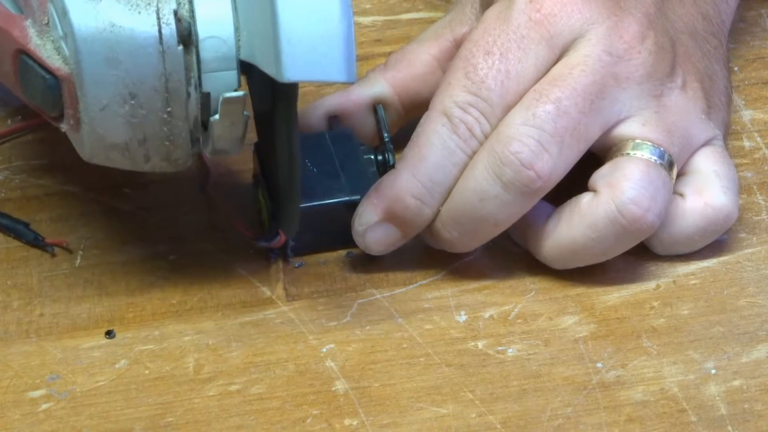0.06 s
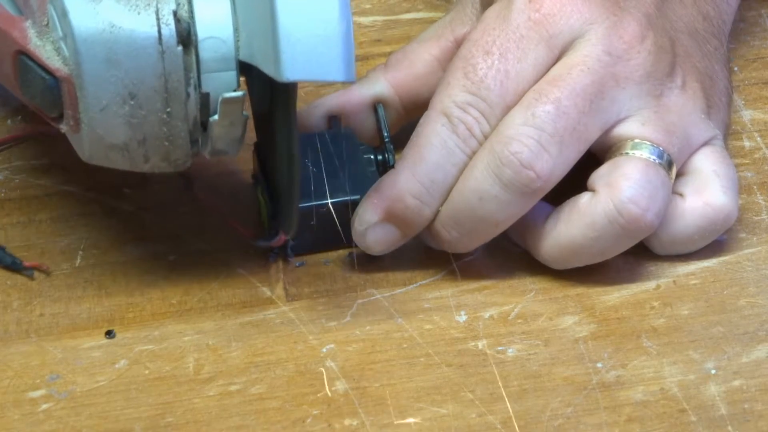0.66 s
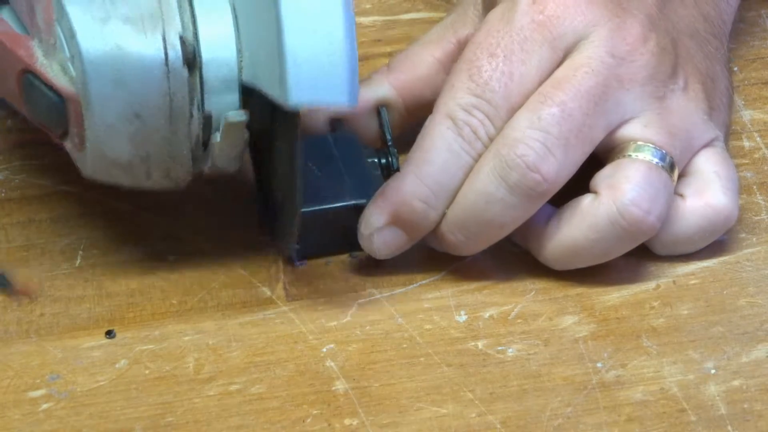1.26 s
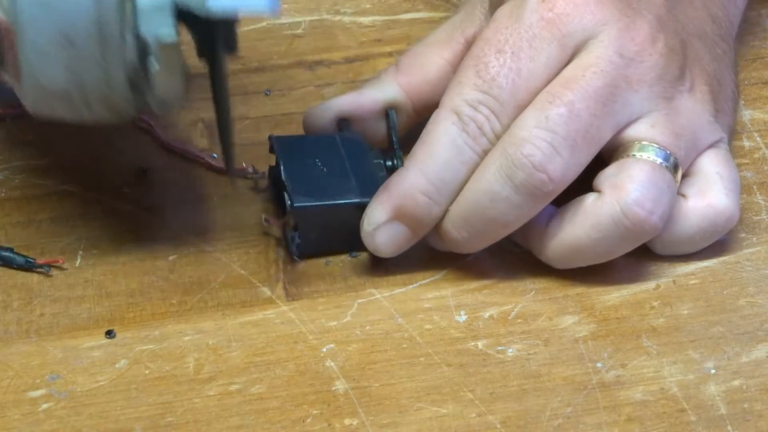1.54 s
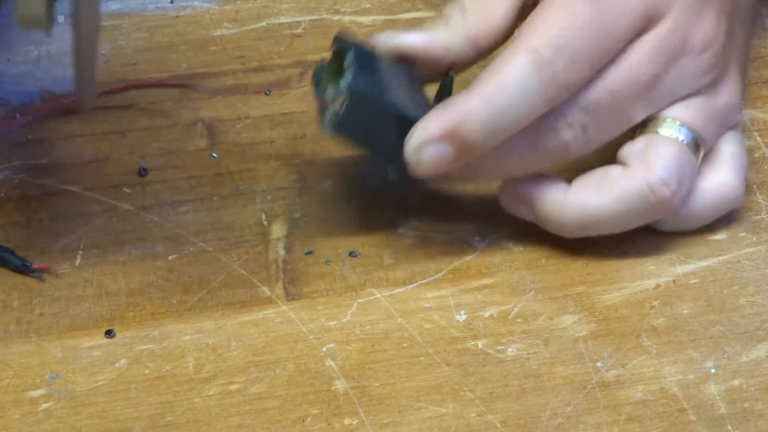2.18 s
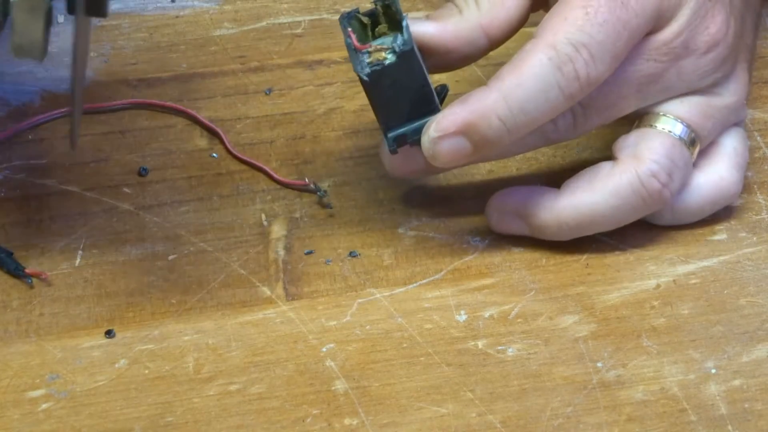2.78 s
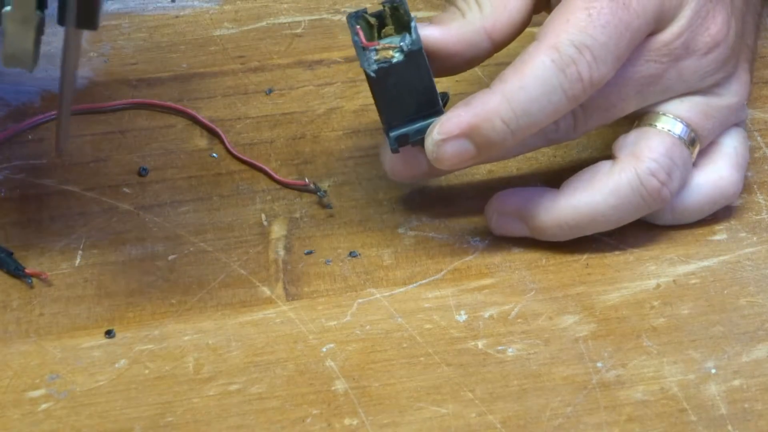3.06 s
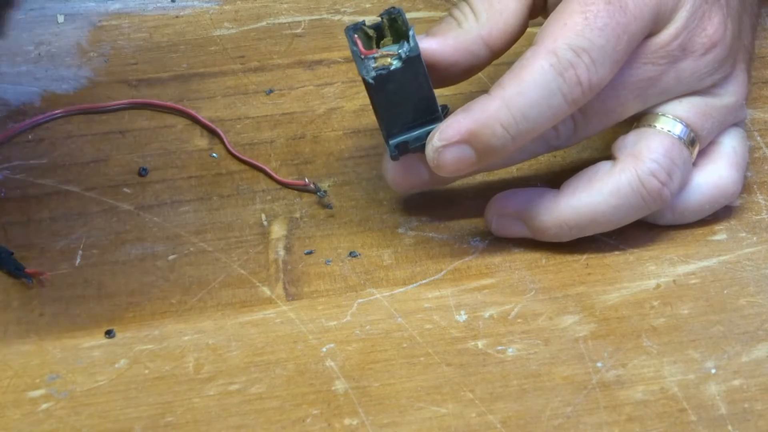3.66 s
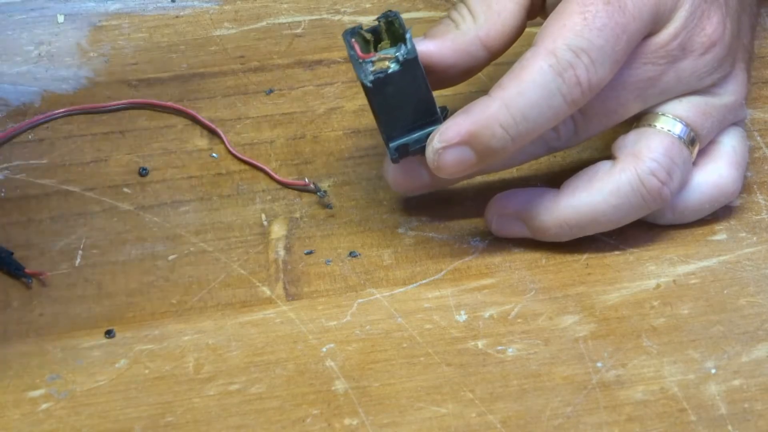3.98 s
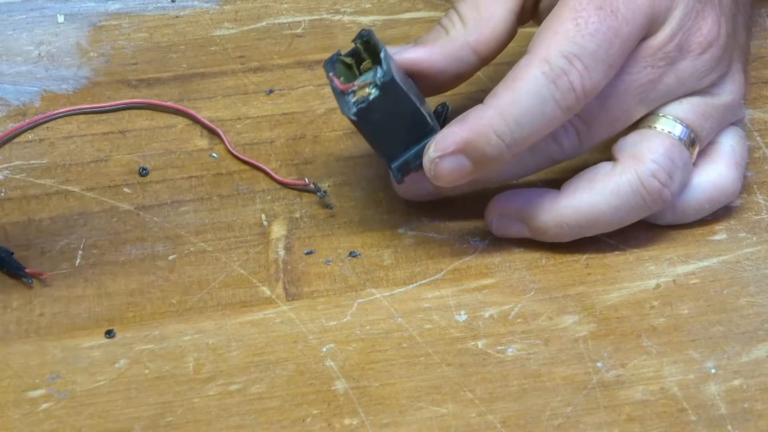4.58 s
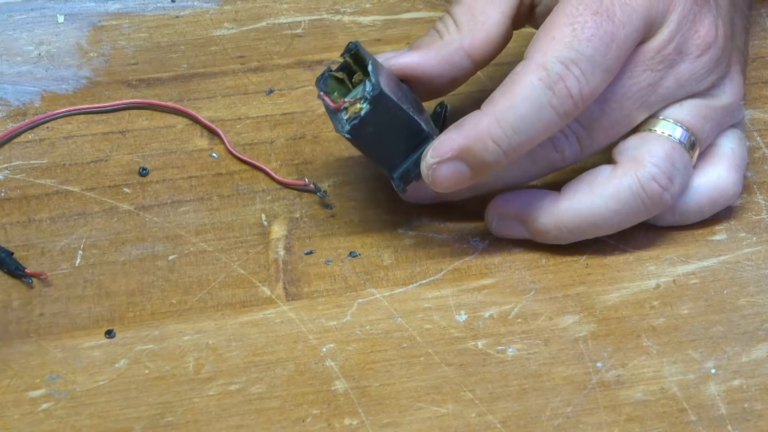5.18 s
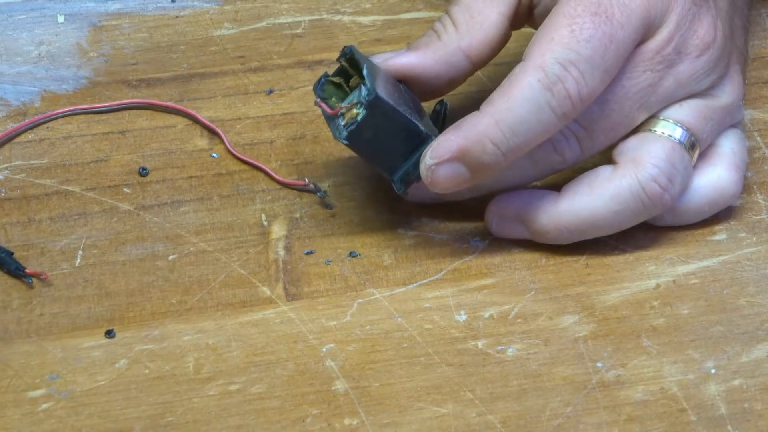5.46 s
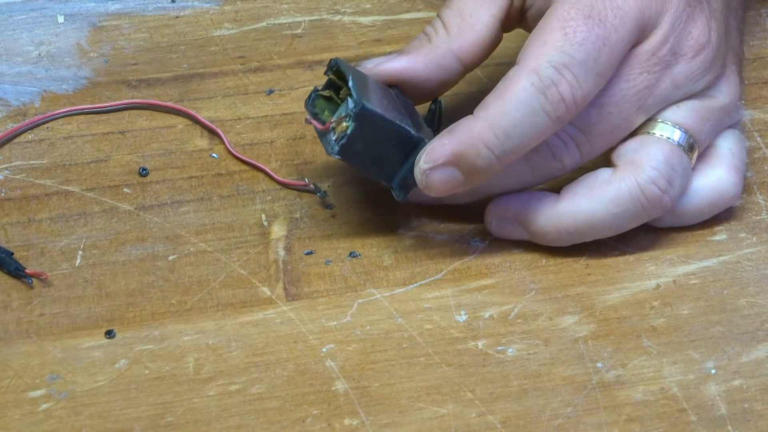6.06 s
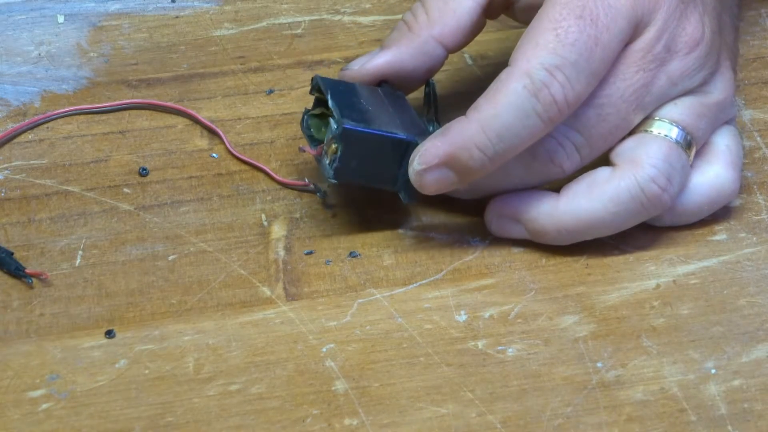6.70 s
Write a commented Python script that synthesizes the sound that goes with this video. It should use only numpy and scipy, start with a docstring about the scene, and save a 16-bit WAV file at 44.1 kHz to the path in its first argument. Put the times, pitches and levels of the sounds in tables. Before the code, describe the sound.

Close to a wooden workbench, an angle grinder cuts a small plastic case with a gritty rasp and shifting squeals. It soon lifts clear and runs free with rushing air and a motor whine, then is switched off and coasts to rest, gears rattling. It is laid down with a double knock and a lighter one. Faint room hiss rises and the case scrapes softly on the bench.

```python
"""Workshop, stereo microphone close to a wooden bench, steady work just left of centre. An angle grinder cuts a
small plastic case: grit tears, and the rubbing disc squeals on multiples of its speed. At 1.2 s it lifts clear
and runs free, fan rushing, motor whining. Switched off at 2.8 s, it coasts to rest, gear teeth rattling the
housing. At 5.6 s it is laid down with a double knock and a lighter one; the background hiss then rises, a
little to the right, and the case scrapes on the bench."""
import sys
import numpy as np
from scipy import signal
from scipy.fft import rfft, irfft, next_fast_len
from scipy.io import wavfile
from scipy.ndimage import uniform_filter1d, map_coordinates

SR = 44100
rng = np.random.default_rng(int(sys.argv[2]) if len(sys.argv) > 2 else 0)


def digitize_waveform(pressure):
    """Quantize a signal to 16-bit integers and store it at the path in sys.argv[1].

    Rows of a 2-D input are taken as channels; values are limited to [-1, 1].
    """
    field = np.atleast_2d(pressure).T
    bounded = np.clip(field, -1, 1)
    quanta = np.round(bounded * 32767).astype(np.int16)
    wavfile.write(sys.argv[1], SR, quanta)


N = 305613
T = np.arange(N) / SR
TOP_HZ = 11080  # upper edge of the microphone's band
LIFT_S, RUN_UP_S, FREE_HZ = 1.17, 0.55, 138.8  # out of the cut the disc runs up to its free speed
SWITCH_OFF_S, STOP_S, DRAG_S = 2.835, 5.07, 1.95  # DRAG_S: time constant of the coasting

# spectrum of the room tone: f/Hz, level/dB
HISS_SPECTRUM = [(35, -62.5), (100, -34.5), (170, -25.5), (400, -25), (620, -20.5), (800, -16.5),
                 (1150, -9), (1550, -2.5), (1800, -4), (2000, -13.5), (2500, -18), (3600, -27), (4600, -22),
                 (6500, -29), (11000, -28.5)]
# room tone at the microphone: t/s, level/dB
HISS_ENVELOPE = [(0, -63), (5.2, -73), (5.58, -72), (5.75, -60.5), (6.15, -60), (6.45, -58), (6.93, -56)]
# where the bench sounds sit between the channels: t/s, left minus right/dB
BALANCE = [(0, 0.8), (1.7, 1), (3.2, .9), (4.7, 2.4), (5.4, 0), (5.6, 1.5)]
# resonances of the scraping case: f/Hz, width/Hz, level/dB
CASE_MODES = [(5700, 450, 0), (7400, 600, -8)]
# the tool rubs the bench as it is lowered: t/s, level/dB
BENCH_RUBS = [(4.98, -67.5), (5.57, -71)]
# the tool lands on the bench: t/s, level/dB, contact/ms
LANDINGS = [(5.583, -5, 0.18), (5.606, -10, 0.19), (5.81, -15, 0.21)]
# resonances struck by the landing: f/Hz, level/dB, t60/s
BENCH_MODES = [(185.4, -4, 0.35), (440, -6, 0.19), (635, -1.5, 0.23), (680, 1, 0.23), (770, 0.5, 0.28),
               (816, 3, 0.31), (990, 0, 0.23), (1010, -3, 0.18), (1150, -2, 0.42), (1410, -29, 0.71),
               (1450, 1, 0.39), (1800, 0.5, 0.27)]
# spectrum of a landing's crack and thud: f/Hz, level/dB
THUD_SPECTRUM = [(30, -46), (110, -14), (190, -13), (290, -19), (450, -22), (700, -11), (1080, 6.5),
                 (1400, -8.5), (2100, -12), (3200, -25), (6000, -23.5), (11000, -23)]
# spectra of the fan's rush, the vents it passes and the motor brushes: f/Hz, level/dB
FAN_SPECTRUM = [(100, -24), (220, -20.5), (350, -5), (550, -6), (750, -3), (900, -2.5), (1150, -0.5),
                (1550, -2.5), (2500, -0.5), (6000, -8)]
VENT_SPECTRUM = [(40, -45), (120, -33), (230, -22), (330, -6), (500, 1.5), (850, 6.5), (1100, 4), (1320, 8),
                 (1650, 0.5), (2500, 5), (5000, -31)]
BRUSH_SPECTRUM = [(150, -50), (1000, -25.5), (1750, -4.5), (1900, 2.5), (2600, 7.5), (3050, 2), (4400, 1),
                  (5500, -1.5), (7500, 4), (9000, -11.5), (11000, -29)]
# motor, fan and gear tones: multiple of disc speed, level/dB, flutter/0-1, exponent of the fade with speed
WHINE_TONES = [(1.33, -70, 0.95, 5.3), (1.97, -63.5, 0.6, 5), (2.68, -57.5, .08, 24),
               (3.966, -62.5, 0.3, 10), (4.94, -65, 0.6, 3), (6.325, -55.5, 0.7, 2.1),
               (8.19, -47.5, 0.5, 18), (20.51, -45, 0.3, 43), (27.97, -53, .3, 8), (31, -52, 0.93, 2.9)]
# low and high resonances of the gear housing: f/Hz, width/Hz, level/dB
HOUSING_LOW_MODES = [(1878, 38, 3.5), (1952, 80, 0.5), (2048, 68, -3), (2120, 38, -10.5), (2332, 49, -13)]
HOUSING_HIGH_MODES = [(3980, 23, -7.5), (4600, 62, -2.5), (5080, 90, -10.5), (5445, 170, -5.5),
                      (5544, 51, 1.5), (5840, 140, -7.5), (6080, 240, -16.5), (6920, 44, -1.5),
                      (7084, 72, 3), (8260, 90, -6), (8710, 100, -10.5), (9370, 30, -9.5),
                      (10690, 300, -6.5)]
# housing and disc ring out for a moment: t/s, boost/dB
RING_BOOSTS = [(.02, 12.5), (2.0, 11.5), (2.3, 6), (2.62, 7.5), (3.14, 2), (3.76, 2), (4.32, 5.5)]
# spectra of the tooth clicks and of grit on plastic: f/Hz, level/dB
TOOTH_SPECTRUM = [(100, -79), (300, -37), (700, -25.5), (1600, -19), (2000, -4), (2500, -6), (3200, -9.5),
                  (4400, -5), (5800, 1), (6600, -1.5), (7500, -0.5), (9000, -7), (10200, -2.5),
                  (11000, -13.5)]
GRIT_SPECTRUM = [(30, -38), (130, -36.5), (200, -28.5), (450, -26), (800, -10), (1500, -6.5), (2300, -3.5),
                 (2900, -6.5), (4200, -3.5), (6200, -0.5), (7500, -3), (9100, -3), (11000, -7)]
# envelope over the harmonics of the rim in the slot: f/Hz, level/dB
RIM_SPECTRUM = [(255, -56), (382, -67.5), (640, -69), (765, -59), (1000, -64), (1150, -52.5), (1530, -58.5),
                (1680, -58), (2040, -48.5), (2400, -61), (2680, -48)]
# the disc catches anew in the slot: start/s, end/s, disc speed/Hz, squeal level/dB, five speed multiples
DISC_CATCHES = [(0, .3, 127.5, -45.5, (13, 28, 31, 45, 53)), (.25, .57, 127.1, -41.5, (16, 27, 28, 45, 53)),
                (.57, .86, 128.1, -42.5, (17, 24, 35, 43, 48)),
                (.86, 1.17, 127.3, -45.5, (16, 45, 46, 48, 68))]
# the five squeals of a catch, lowest first: relative level/dB
SQUEAL_LEVELS = [-2, -4.5, -3, 0.5, -1]
# how hard the disc bites: t/s, share/0-1
BITE_SHARE = [(0, 0.94), (1.15, 0.77), (1.28, 0.4), (1.31, 0.16), (1.5, 0.07)]
# the tool is pressed in, eased, pulled out and moved aside: t/s, level/dB
TOOL_ENVELOPE = [(0, -26.5), (.16, -26.5), (.34, -30.5), (.62, -29.5), (1.15, -31), (1.25, -28),
                 (1.55, -32), (2.85, -28.5)]


def undb(db):
    """Decibels to gain."""
    return 10 ** (np.asarray(db) / 20)


def curve(rows):
    """Join (time, value) rows by straight lines."""
    return np.interp(T, *np.transpose(rows))


def unit(x):
    """Scale to rms 1."""
    return x / np.sqrt(np.mean(x ** 2) + 1e-20)


def noise():
    """White noise."""
    return rng.standard_normal(N)


def walk(rate):
    """Random drift with a spread near 1, changing rate times a second."""
    return 1.2 * np.interp(T * rate, np.arange(4096), rng.standard_normal(4096))


def colour(x, points):
    """Filter by a spectrum of (f/Hz, level/dB) points, cut off just above TOP_HZ."""
    size = next_fast_len(len(x) + 4096)
    hz, db = np.transpose(points)
    f = np.maximum(np.arange(size // 2 + 1) * SR / size, 1)
    gain = undb(np.interp(np.log(f), np.log(hz), db)) * (f < TOP_HZ * 1.02)
    return irfft(rfft(x, size) * gain, size)[:len(x)]


def ring(x, modes, swell_db=0, swell_rate=6):
    """Resonances (f/Hz, width/Hz, level/dB), applied twice for steep skirts; each drifts by swell_db."""
    out = 0
    for hz, width, db in modes:
        b, a = signal.iirpeak(hz, hz / (1.5 * width), SR)
        out += undb(db + swell_db * walk(swell_rate)) * signal.lfilter(b, a, signal.lfilter(b, a, x))
    return out


def room_hiss(side_db=-7, right_db=2):
    """Room tone: a soft, hollow hiss, wider than the tool and a little to the right."""
    mid, side = (unit(colour(noise(), HISS_SPECTRUM)) for _ in range(2))
    sides = np.array([[1], [-1]])
    return (mid + undb(side_db) * side * sides) * undb(curve(HISS_ENVELOPE) - sides * right_db / 2)


def workshop(x, wet_db=-9, t60_s=.22):
    """Direct sound from a little to the left; short reflections reach the channels in opposite phase."""
    t = T[:SR // 3]
    tail = rng.standard_normal(len(t)) * undb(-60 * t / t60_s) * (t > .002)
    wet = signal.fftconvolve(x, tail / np.sqrt(np.sum(tail ** 2)))[:N]
    sides = np.array([[1], [-1]])
    return x * undb(sides * curve(BALANCE) / 2) + sides * undb(wet_db) * wet / np.sqrt(2)


def case_scrape(start_s=6.37, db=-66, attack_s=0.017, t60_s=0.53, grain_db=2):
    """Plastic drags briefly over the wood with a thin, grainy squeak."""
    t = np.maximum(T - start_s, 0)
    grain = unit(ring(noise() * undb(grain_db * walk(200)), CASE_MODES))
    return grain * np.minimum(t / attack_s, 1) * undb(db - 60 * t / t60_s)


def bench_rubs(hz=655, width_hz=45, length_s=0.05):
    """A soft groan of the bench top swells and fades with each rub."""
    swell = sum(undb(db) * np.exp(-((T - s) / length_s) ** 2) for s, db in BENCH_RUBS)
    return swell * unit(ring(noise(), [(hz, width_hz, 0)]))


def knocks(ring_db=-42, thud_db=-32, crack_db=-24, thud_t60_s=0.41, crack_t60_s=0.0077):
    """Each landing cracks, rings the bench and dies away in the room."""
    t = T[:SR // 2]
    out = np.zeros(N + len(t))
    for s, db, contact_ms in LANDINGS:
        modes = sum(undb(mode_db - 60 * t / t60) * rng.choice([-1, 1]) * np.sin(2 * np.pi * hz * t)
                    for hz, mode_db, t60 in BENCH_MODES)
        decay = undb(thud_db - 60 * t / thud_t60_s) + undb(crack_db - 60 * t / crack_t60_s)
        hit = undb(ring_db) * modes + decay * unit(colour(rng.standard_normal(len(t)), THUD_SPECTRUM))
        soft = np.exp(-1000 / (contact_ms * SR))  # longer contact, duller knock
        start = int(s * SR)
        out[start:start + len(t)] += undb(db) * signal.lfilter([1 - soft], [1, -soft], hit)
    return signal.sosfilt(signal.butter(2, 130, "high", fs=SR, output="sos"), out[:N])


def fan(speed, power, rush_db=-2, casing_db=-6, driven_db=-7.5, coast_db=-14.5, slow_db=-18.5):
    """The rush of air sinks by up to an octave as it slows and loses its rumble; the vents keep their colour."""
    pace = speed / speed.max()
    travel = np.cumsum(np.maximum(pace, .5))
    rush = map_coordinates(colour(noise(), FAN_SPECTRUM), [travel], order=3, mode="wrap")
    air = undb(rush_db) * unit(colour(rush, VENT_SPECTRUM))
    air += undb(casing_db) * unit(colour(colour(noise(), FAN_SPECTRUM), VENT_SPECTRUM))
    thin = colour(air, [(150, -24.5), (330, 0)])
    coasting = undb(coast_db) * (speed / FREE_HZ) ** 4 + undb(slow_db)
    flow = power * undb(driven_db) + (1 - power) * coasting
    return flow * (thin + pace ** 2 * (air - thin))


def brushes():
    """The motor's brushes hiss as they slide."""
    return unit(colour(noise(), BRUSH_SPECTRUM))


def whine(turns, speed, flutter_rate=35, wander=0.0404):
    """Motor, fan and gear tones flutter in turbulent air; they fade and blur as the shaft slows."""
    out, pace = 0, speed / speed.max()
    for multiple, db, flutter, steepness in WHINE_TONES:
        sway = 1 - flutter + flutter * (walk(flutter_rate) + 1j * walk(flutter_rate))
        stray = np.cumsum(speed * wander * np.minimum(5 * (1 - pace), 1) * walk(60)) / SR
        tone = unit(np.real(sway * np.exp(2j * np.pi * multiple * (turns + stray))))
        out += undb(db) * pace ** steepness * tone
    return colour(out, [(100, -31.5), (260, -9.0), (360, 4.5)])  # the small body radiates little bass


def disc_ring(speed, rest_hz=2030, stiffening=38, flutter_rate=70):
    """A bending mode of the disc, tightened by the spin, sinks as it slows."""
    phase = 2 * np.pi * np.cumsum(np.sqrt(rest_hz ** 2 + stiffening * speed ** 2)) / SR
    return unit(walk(flutter_rate) * np.cos(phase) + walk(flutter_rate) * np.sin(phase))


def tooth_blows(speed, teeth=36, scatter_db=2, throb_rate=110, scrape=0.81):
    """A blow for each meshing tooth, spread by its bounces, over the scrape of the bearings."""
    mesh = np.cumsum(speed * np.exp(.25 * walk(400))) * teeth / SR
    hits = np.diff(np.floor(mesh), prepend=0) * undb(scatter_db * noise())
    energy = signal.lfilter([1], [1, -np.exp(-1000 / SR)], hits ** 2)  # bounces decay over 1 ms
    energy /= uniform_filter1d(energy, size=2000).clip(0) + 1e-3
    throb_db = 1 - speed / speed.max() / 2  # backlash chatters more as the gears slow
    return unit(noise() * np.sqrt(np.minimum(energy, 6) + scrape ** 2) * undb(throb_db * walk(throb_rate)))


def gears(speed, click_gain, ring_gain, teeth_db=-1, high_db=-6, low_db=-2, disc_db=-8, scrape_db=-2):
    """Teeth click and ring the housing, and the disc rings along; slow teeth leave a narrow scrape."""
    blows = tooth_blows(speed)
    slow = np.clip(1 - speed / speed.max(), 0, 1) ** 3
    clicks = undb(teeth_db) * unit(colour(blows, TOOTH_SPECTRUM))
    clicks += undb(high_db) * unit(ring(blows, HOUSING_HIGH_MODES, swell_db=4))
    scrape = undb(scrape_db) * unit(ring(tooth_blows(speed), [(5550, 650, 0)]))
    body = undb(low_db) * unit(ring(blows, HOUSING_LOW_MODES, swell_db=3))
    body += undb(disc_db) * disc_ring(speed)
    return click_gain * (undb(-6 * slow) * clicks + slow * scrape) + ring_gain * body


def rim_hum(turns, top_order=21, waver_db=3.5, waver_rate=9, easing_db_per_s=7):
    """The uneven rim presses on the slot once a turn; the lowest tones ease most as the cut opens."""
    out, on = np.zeros(N), T < LIFT_S + RUN_UP_S
    hz, db = np.transpose(RIM_SPECTRUM)
    loaded_hz = DISC_CATCHES[0][2]
    for order in range(2, top_order + 1):
        level = np.interp(np.log(order * loaded_hz), np.log(hz), db)
        level -= easing_db_per_s * min(6 / order, 1) * T[on]
        level += waver_db * min(order / 10, 1) * walk(waver_rate)[on]
        out[on] += undb(level) * np.sqrt(2) * np.sin(2 * np.pi * (order * turns[on] + rng.random()))
    return out


def squeals(turns, fade_s=0.066, waver_db=2, jitter_rad=0.14):
    """At each catch the thin disc rings on whole multiples of its speed, roughened by the grit."""
    out = np.zeros(N)
    for start, end, _, db, orders in DISC_CATCHES:
        on = (T > start - fade_s / 2) & (T < end + fade_s / 2)
        gate = np.clip(np.minimum(T[on] - start, end - T[on]) / fade_s + .5, 0, 1)
        for order, mode_db in zip(orders, SQUEAL_LEVELS):
            phase = 2 * np.pi * (order * turns[on] + rng.random()) + jitter_rad * walk(120)[on]
            out[on] += gate * undb(db + mode_db + waver_db * walk(30)[on]) * np.sqrt(2) * np.sin(phase)
    return out


def grit(turns, rub_db=-4.5, buzz_db=-5.5, wobble=0.13, grit_db=3.5, rim_points=1024):
    """Grit tears the case; the rim's bumps come round each turn and slowly wear into new ones."""
    rims = signal.resample(rng.standard_normal((64, rim_points // 4)), rim_points, axis=1)
    buzz = map_coordinates(rims, [T * 4, turns % 1 * rim_points], order=1, mode="grid-wrap")
    buzz = colour(colour(buzz, GRIT_SPECTRUM), [(300, -2), (1200, -1), (3500, 2.4), (9000, -1.5)])
    rub = noise() * (1 + wobble * np.cos(2 * np.pi * turns)) * undb(grit_db * walk(450))
    return undb(rub_db) * unit(colour(rub, GRIT_SPECTRUM)) + undb(buzz_db) * unit(buzz)


def disc_speed():
    """Turns a second: each catch loads the disc; lifted, it runs up; drag and friction then stop it."""
    loaded = curve([(start + share * (end - start), hz)
                    for start, end, hz, _, _ in DISC_CATCHES for share in (.25, .75)])
    run_up = np.sin(np.pi / 2 * np.clip((T - LIFT_S) / RUN_UP_S, 0, 1))
    driven = loaded + (FREE_HZ - loaded) * run_up
    drag = np.exp(-np.maximum(T - SWITCH_OFF_S, 0) / DRAG_S)
    at_rest = np.exp(-(STOP_S - SWITCH_OFF_S) / DRAG_S)
    return np.maximum(driven * (drag - at_rest) / (1 - at_rest), .01)


def tool_gain(speed, knee_hz, settle_s=0.035):
    """Slow teeth strike softly: below the knee speed the tool fades, lagging a little behind the shaft."""
    pole = np.exp(-1 / (settle_s * SR))
    lagged = speed[0] + signal.lfilter([1 - pole], [1, -pole], speed - speed[0])
    return undb(curve(TOOL_ENVELOPE)) * lagged / np.hypot(lagged, knee_hz)


def grinder(ring_cut_db=-18, ring_free_db=-11.5, swell_s=0.09, gears_db=0.76, brush_db=-2.5, whine_db=-1):
    """The main source: bite, power and speed decide which parts of the tool are heard."""
    speed, bite = disc_speed(), curve(BITE_SHARE)
    free = 1 - bite
    turns = np.cumsum(speed * (1 + .0005 * walk(20))) / SR
    power = np.clip((SWITCH_OFF_S - T) / .052 + .5, 0, 1)
    gain = tool_gain(speed, knee_hz=31)  # clicks and air fade first, the ring last
    swells_db = sum(db * np.exp(-((T - s) / swell_s) ** 2) for s, db in RING_BOOSTS)
    ring_gain = tool_gain(speed, knee_hz=18) * undb(bite * ring_cut_db + free * ring_free_db + swells_db)
    # torque holds the teeth together; without power they rattle freely
    slack = 1 - power + power * (0.31 * bite + 0.53 * free)
    slack += 0.22 * np.sin(np.pi * bite)  # chatter as the disc slips out
    tool = undb(gears_db) * slack * gears(speed, gain, ring_gain)
    tool += bite * (gain * grit(turns) + rim_hum(turns)) + squeals(turns)
    # out of the cut the gritty rim still rasps in the air, without bass
    tool += 0.28 * free * gain * colour(grit(turns), [(120, -14.5), (400, -1)])
    tool += power * free ** 2 * gain * undb(brush_db) * brushes()
    tool += free ** 2 * undb(whine_db) * whine(turns, speed)
    return tool + (free ** 3 + 0.06 * bite) * gain * fan(speed, power)


def scene():
    """Grinder and bench close up, the room tone behind them."""
    return workshop(grinder() + knocks() + bench_rubs() + case_scrape()) + room_hiss()


def record(dry):
    """The microphone chain cuts the top steeply."""
    return signal.sosfilt(signal.ellip(12, .2, 80, TOP_HZ, fs=SR, output="sos"), dry)


dry = scene()
out = record(dry)
digitize_waveform(out)
```